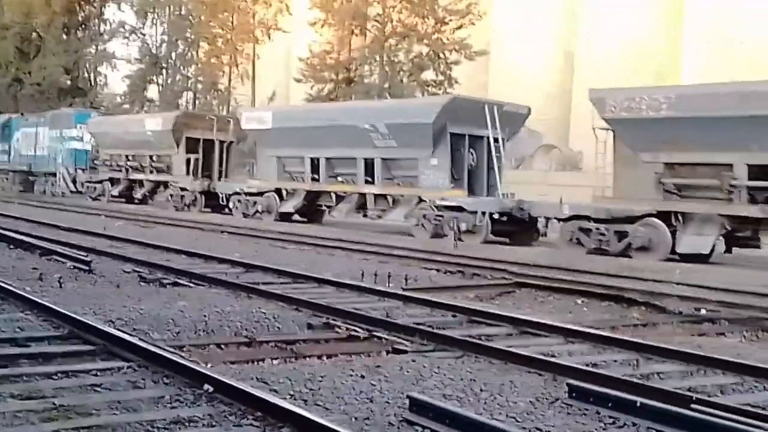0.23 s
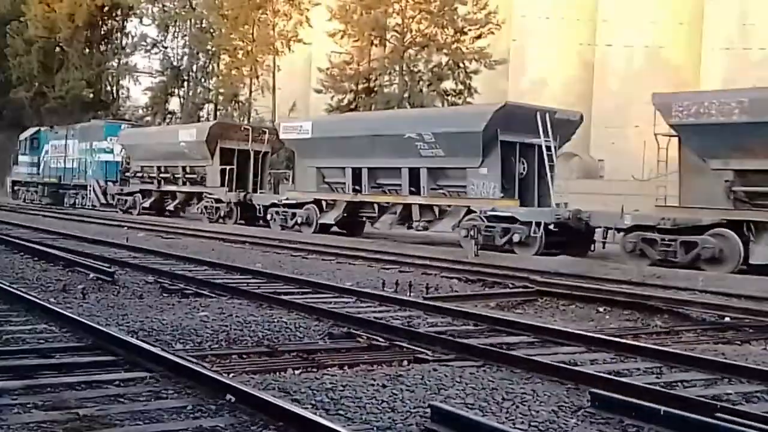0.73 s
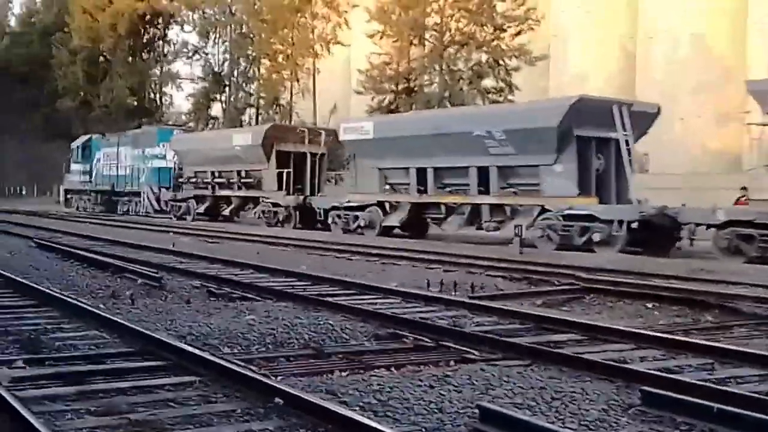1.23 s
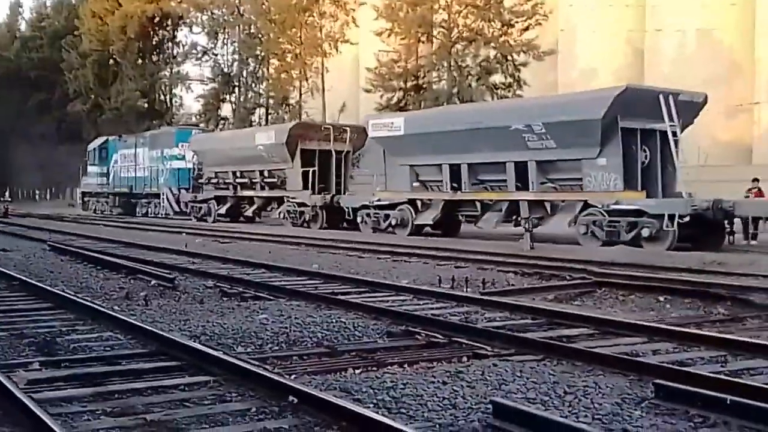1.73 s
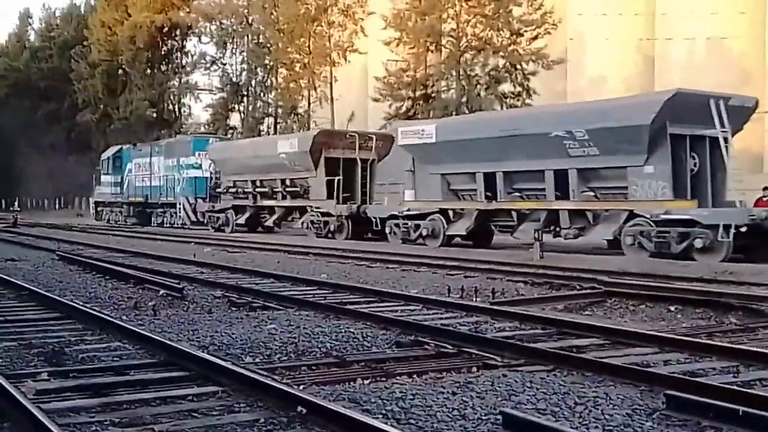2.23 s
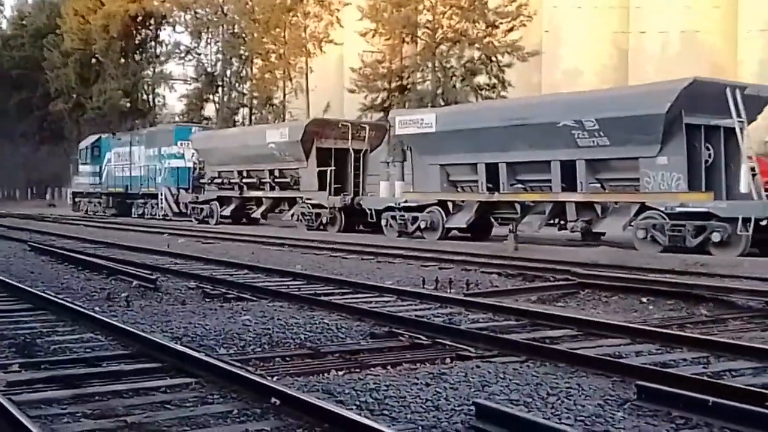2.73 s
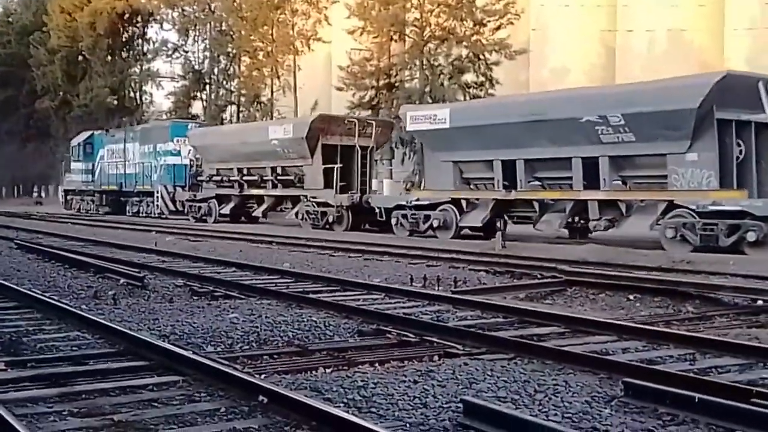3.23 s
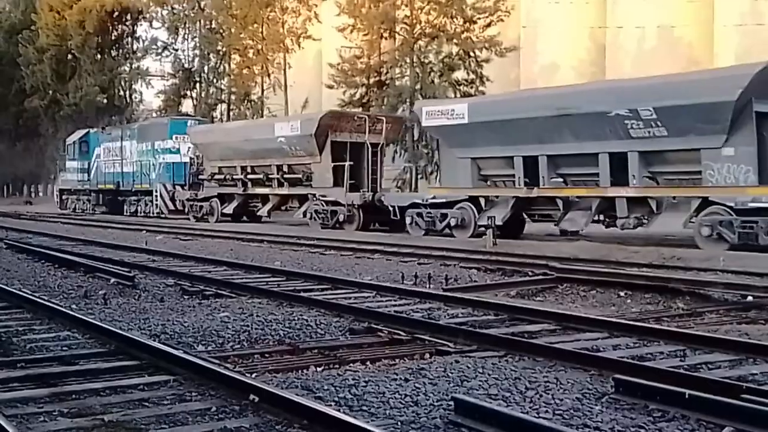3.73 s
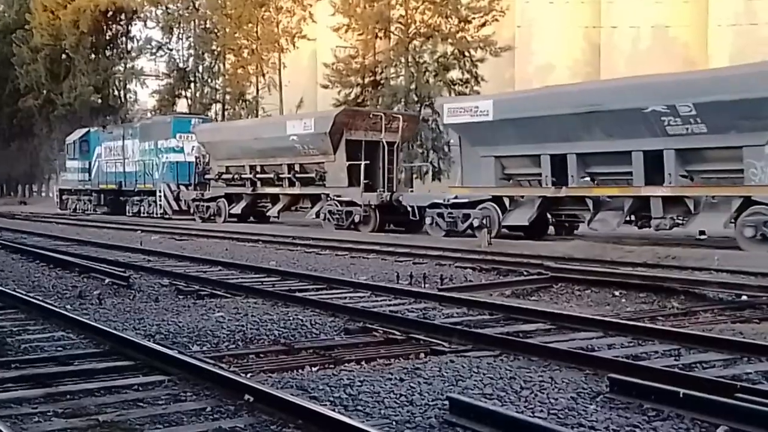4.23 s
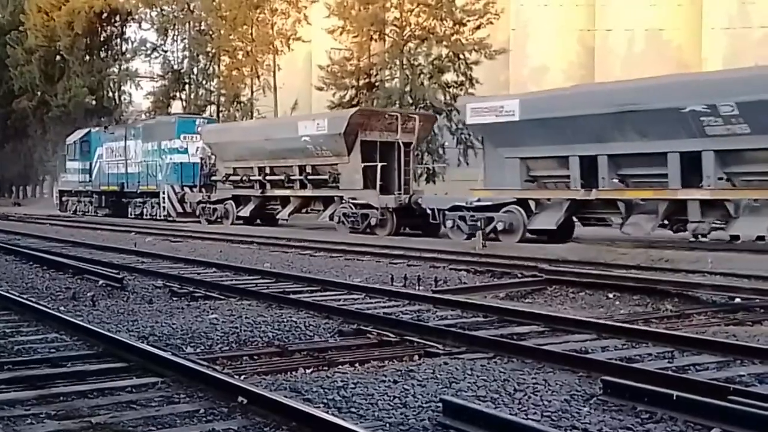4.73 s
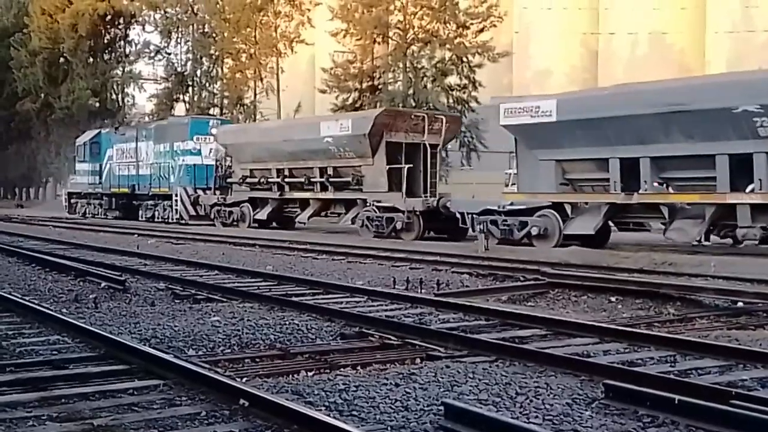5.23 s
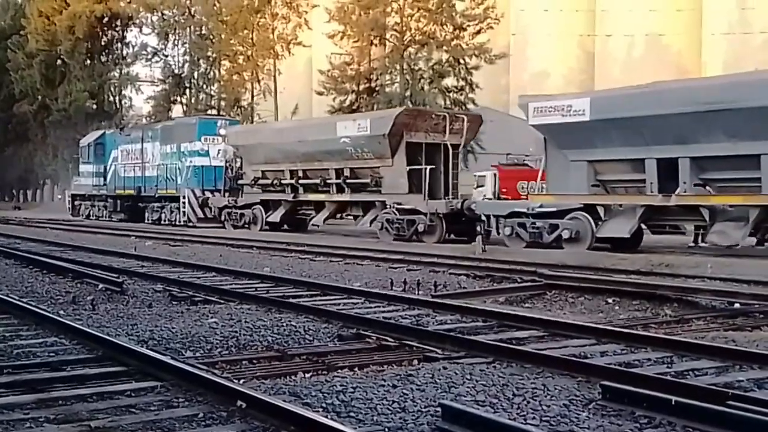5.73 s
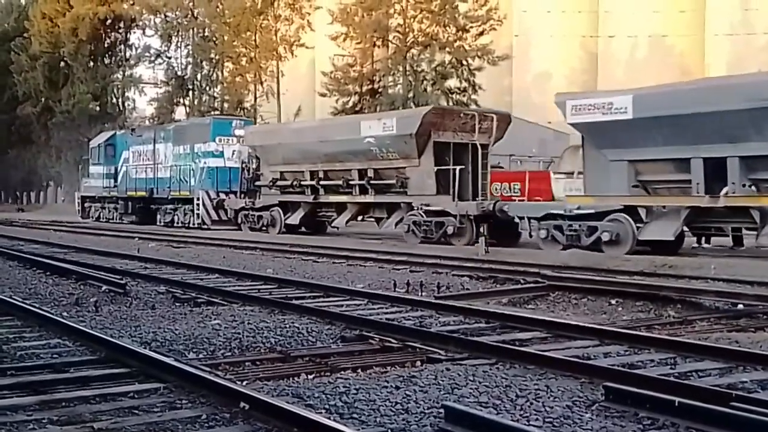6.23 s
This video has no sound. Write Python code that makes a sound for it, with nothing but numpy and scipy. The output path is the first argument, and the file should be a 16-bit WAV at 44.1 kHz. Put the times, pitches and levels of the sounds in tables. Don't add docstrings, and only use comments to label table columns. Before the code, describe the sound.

Low, gusting diesel rumble lies under a steady grainy hiss of steel wheels. Wagon bodies thud dully over joints, couplings tick, and flanges brush with thin metallic ringing. Birds in nearby trees give short descending whistles, echoed by hard walls. A brief chirp of steel comes at three seconds, a strong multi-toned squeal near four, another after six; all heard from some distance in the open.

```python
import sys
import numpy as np
from scipy import signal
from scipy.fft import rfft, irfft, next_fast_len
from scipy.io import wavfile

SR = 44100
rng = np.random.default_rng(int(sys.argv[2]) if len(sys.argv) > 2 else 0)


def level_to_linear(level):
    exponent = np.asarray(level, float) / 20
    return 10 ** exponent


def to_wav(s):
    ch = np.atleast_2d(s).T
    pcm = np.round(np.clip(ch, -1, 1) * 32767)
    wavfile.write(sys.argv[1], SR, pcm.astype(np.int16))


N = 286194
SPAN = next_fast_len(N)
BINS = np.fft.rfftfreq(SPAN, 1 / SR) + 1e-3
RUB_DB = -67.5


def rms_one(x):
    return x / np.sqrt(np.mean(x ** 2) + 1e-20)


def in_time(rows):
    s, *columns = np.transpose(rows)
    return [np.interp(np.arange(N) / SR, s, c) for c in columns]


def drift(rate_hz, size=N):
    pole = np.exp(-80 * np.pi * rate_hz / SR)
    coarse = rng.standard_normal(size // 40 + 602)
    slow = signal.lfilter([1], [1, -2 * pole, pole * pole], coarse)[500:]
    return np.interp(np.arange(size) / 40, np.arange(len(slow)), rms_one(slow))


def coloured(spectrum, patchy_db, rate_hz):
    hz, level_db = np.transpose(spectrum)
    log_bins = np.log(BINS)
    shape = level_to_linear(np.interp(log_bins, np.log(hz), level_db, left=-200, right=-200))
    upper = np.interp(log_bins, np.log(hz[[0, -1]]), [0, 1])
    noise = rfft(rng.standard_normal(SPAN)) * shape
    total = np.zeros(N)
    for share in (upper, 1 - upper):
        total += irfft(noise * share, SPAN)[:N] * level_to_linear(patchy_db * drift(rate_hz))
    return rms_one(total)


def thin_modes(noise, low_hz, high_hz, count, width_hz=12.5, come_and_go_db=4.0):
    spectrum = rfft(noise, SPAN)
    place = (np.arange(6)[:, None] + rng.random((6, count))) / 6
    modes_hz = low_hz + (high_hz - low_hz) * (np.arange(count) + place) / count
    lines = np.zeros(N)
    for group in modes_hz:
        comb = np.zeros(len(BINS))
        for hz in group:
            near = slice(*np.searchsorted(BINS, [hz - 150, hz + 150]))
            comb[near] += 1 / (1 + ((BINS[near] - hz) / width_hz) ** 2)
        lines += irfft(spectrum * comb, SPAN)[:N] * level_to_linear(come_and_go_db * drift(7.1))
    return rms_one(lines)


def add(out, s, sound):
    i = max(round(s * SR), 0)
    out[i:i + len(sound)] += sound[:N - i]


def tone(hz):
    return np.sqrt(2) * np.sin(2 * np.pi * np.cumsum(hz) / SR)


def rumble():
    # t/s, level/dB
    load = [(0.0, -34.5), (0.6, -35.5), (0.72, -43.5), (1.02, -44.5), (1.2, -33.5), (1.68, -31),
            (1.76, -41), (2.6, -37), (2.88, -46.5), (2.98, -31), (3.38, -31), (3.46, -40.5), (3.8, -43.5),
            (3.92, -31), (5.25, -32.5), (5.5, -37.5), (6.04, -37), (6.2, -32)]
    # f/Hz, level/dB per Hz
    deep_spectrum = [(12, -57), (20, -16), (70, -3), (110, 2), (140, -36), (240, -120)]
    # f/Hz, level/dB per Hz
    upper_spectrum = [(53, -8.5), (90, -0.5), (135, 0.5), (163, 3.5), (195, -1), (230, -13), (300, -28),
                      (390, -29), (660, -120)]
    deep_offset_db, deep_follows = -5.0, 0.58
    level_db, = in_time(load)
    deep_db = deep_offset_db + (deep_follows - 1) * (level_db - level_db.mean())
    deep = level_to_linear(deep_db) * coloured(deep_spectrum, patchy_db=1.2, rate_hz=7.0)
    upper = coloured(upper_spectrum, patchy_db=2.2, rate_hz=7.0)
    return level_to_linear(level_db) * (deep + upper)


def rolling():
    # t/s, level/dB
    weight = [(0.0, -49.5), (0.23, -48), (0.54, -51), (2.86, -51), (3.13, -48.5), (3.42, -50),
              (3.74, -49.5), (4.05, -47.5), (4.37, -50), (6.02, -50), (6.34, -49.5), (6.49, -48.5)]
    # f/Hz, level/dB per Hz
    body_spectrum = [(140, -21), (230, -2.5), (309, -5.5), (399, -4), (578, -12.5), (782, -9.5),
                     (863, -8.5), (959, -13.5), (1170, -12.5), (1400, -25), (1820, -39), (3080, -120)]
    # f/Hz, level/dB per Hz
    tread_spectrum = [(590, -21), (1000, -4.5), (1410, -1), (1850, -3.5), (2330, 1), (2700, -5),
                      (3330, -5.5), (3890, -5), (4410, -9), (5720, -17.5), (7140, -15), (7710, -13),
                      (10000, -22), (13000, -28.5), (22000, -120)]
    body_offset_db, body_follows, tread_db = 0.75, 0.49, 1.25
    roll_db, = in_time(weight)
    mean_db = roll_db.mean()
    body_db = body_offset_db + mean_db + body_follows * (roll_db - mean_db)
    body = level_to_linear(body_db) * coloured(body_spectrum, patchy_db=1.0, rate_hz=2.4)
    hiss = coloured(tread_spectrum, patchy_db=0.8, rate_hz=5.1)
    ringing = thin_modes(hiss, 2600, 9500, count=12, come_and_go_db=5.5)
    steel = rms_one(hiss + 0.22 * ringing)
    return body + level_to_linear(tread_db + roll_db) * steel


def brushing():
    # t/s, length/s, level/dB
    brushes = [(0.0, 0.14, -58), (0.43, 0.13, -55), (0.92, 0.33, -59.5), (1.38, 0.093, -57),
               (1.688, 0.15, -53.5), (2.015, .08, -54), (2.16, 0.17, -58), (2.45, 0.17, -56.5),
               (2.89, 0.11, -56), (3.215, 0.12, -62), (3.844, .3, -66), (4.272, 0.19, -62),
               (4.677, 0.14, -57), (5.32, .1, -59), (5.56, .1, -55), (5.706, 0.71, -58),
               (6.09, 0.41, -52.5), (6.423, 0.17, -50)]
    rise_s = 0.034
    t = np.arange(N) / SR
    power = level_to_linear(RUB_DB) ** 2
    for s, length_s, level_db in brushes:
        since = np.maximum(t - s, 0)
        touch = np.minimum(since / rise_s, 1) * np.exp(-(since / length_s) ** 2)
        power = power + (level_to_linear(level_db) * touch) ** 2
    return np.sqrt(power)


def rubbing():
    # f/Hz, level/dB per Hz
    flange_spectrum = [(2650, -22), (4500, -15), (5490, -12.5), (7080, -10), (7700, -6.5), (10600, -15.5),
                       (13500, -10.5), (15100, -11.5), (15600, -16)]
    fizz_hz, fizz_db, fizz_follows = 11000, 2, 0.55
    hiss = coloured(flange_spectrum, patchy_db=1.4, rate_hz=6.8)
    ringing = thin_modes(hiss, 4600, 15400, count=14, width_hz=9.0, come_and_go_db=7.0)
    rub = rms_one(hiss + 1.45 * ringing)
    touch = brushing()
    below = signal.sosfiltfilt(signal.butter(4, fizz_hz, fs=SR, output="sos"), rub)
    fizz_gain = level_to_linear(RUB_DB + fizz_db) * (touch / level_to_linear(RUB_DB)) ** fizz_follows
    return touch * below + fizz_gain * (rub - below)


def squeals():
    # f/Hz, peak level/dB, joins after/s, sings for/s
    heavy_wheel = [(1683, -47, 0, .05), (1886, -47, .01, .12), (2810, -43.5, .08, .2),
                   (2988, -44.5, .06, .19), (3122, -47, .24, .08), (3774, -41.5, .055, .1),
                   (3865, -46, .14, .09), (3690, -49, .3, .24), (4356, -51, 0, .05), (4619, -52, .3, .06),
                   (4788, -48.5, .06, .16), (5146, -45, .01, .13), (5825, -52, .09, .14), (6074, -47, .1, .2),
                   (6900, -50, .16, .12), (7429, -57, .03, .48), (6083, -49, .325, .12),
                 (8421, -46.5, .14, .24), (8872, -54, 0, .18), (9220, -49, .01, .26), (9465, -53, .02, .41),
                 (10779, -60, 0, .19), (12511, -58, .08, .14), (12790, -50, .04, .24),
                 (13464, -52.5, .03, .24), (13900, -54, .04, .14), (14300, -59, 0, .26),
                 (15140, -60, .06, .29),
                   (1890, -44.5, .15, 0.1), (1850, -56, .3, 0.17), (2130, -50, .17, .05),
                   (2810, -57, 0.3, 0.096), (3150, -50, 0.34, 0.063), (3360, -54, 0.28, .06),
                   (3780, -39, .13, 0.2), (3820, -42, 0.26, 0.033), (3770, -48, .31, 0.15),
                   (3865, -48, .25, 0.18), (4360, -47.5, .11, .09), (4356, -45, .22, 0.15),
                   (4330, -55, 0.435, .07), (4785, -42.5, 0.23, 0.14), (4788, -52, 0.32, .05),
                   (5100, -47, 0.18, 0.034), (7500, -51, 0.1, .07), (2988, -47, 0.002, 0.057),
                   (2810, -49, 0.00197, 0.091), (4100, -52, .15, .12), (3776, -47.5, 0.1, 0.424),
                   (4788, -60, 0.026, 0.54), (4356, -48, 0.34, .07), (2988, -57, 0.24, .08),
                   (7429, -64, 0.37, 0.15)]
    late_wheel = [(1800, -50, .01, .03), (1707, -51, .02, .1), (2713, -49, .02, .14),
                  (3122, -49, .008, .06), (3180, -51, .28, .08), (3394, -50, .2, .1),
                  (3663, -45.5, .075, .15), (4000, -52, .13, .15), (4616, -50, .11, .09),
                  (5500, -49.5, .02, .11), (7343, -49.5, .005, .11), (8398, -57, .14, .12),
                  (5703, -51, .12, .07), (4334, -52, .05, .025),
                  (1830, -43, .07, 0.04), (1800, -57, 0.11, .08), (3080, -48, 0.088, .04),
                  (4336, -52, 0.17, .06), (2240, -57, 0.12, .1), (3890, -51, 0.22, .06),
                  (2280, -55, .015, .03), (1800, -55, 0.0047, .23), (5550, -50, 0.14, 0.1),
                  (4334, -49, .09, 0.023), (3661, -56, 0.0088, 0.15), (3122, -57, 0.0073, .16),
                  (5590, -45, 0.095, 0.032)]
    light_wheel = [(2720, -47, .05, 0.035), (3360, -42.5, 0.00069, 0.054), (3750, -46.5, .02, .04),
                   (4150, -50, 0.011, .05), (6400, -64, 0, .1), (2730, -47, 0.13, .03),
                   (3350, -47, 0.065, 0.022), (3350, -42, 0.12, .012), (3784, -46, 0.032, 0.022),
                   (3784, -49, .105, 0.03), (4250, -50, .085, .04), (4183, -45, .145, .02),
                   (4200, -49, 0.185, 0.035), (3350, -58, 0, 0.18), (3784, -57, 0.02, 0.17),
                   (4200, -58, .03, 0.23), (2770, -52.5, .02, 0.19)]
    coupling = [(1190, -43, .016, 0.008), (1800, -52, .025, .02), (2590, -45, 0.021, .012),
                (2870, -44, .023, 0.025), (4530, -50, 0.0032, .035), (5800, -53, 0.016, 0.044),
                (7600, -54, 0.014, .04)]
    # t/s, sings for/s, f/Hz, peak level/dB
    peeps = [(0.14, 0.21, 6886, -64), (0.25, 0.072, 2285, -50), (0.43, 0.16, 8600, -68),
             (0.46, 0.04, 6700, -53), (0.877, 0.024, 4150, -44), (1.08, .08, 6368, -61),
             (1.36, 0.24, 3495, -52.5), (1.405, 0.033, 3470, -44), (1.465, .085, 3530, -49.5),
             (4.72, .03, 6560, -57), (4.71, .05, 3750, -54), (1.36, .09, 9045, -64),
             (1.363, 0.14, 8100, -57), (1.7, .16, 8040, -63), (1.72, .2, 9000, -68), (1.92, .05, 5198, -57),
             (2.016, 0.091, 9844, -61), (2.16, 0.079, 5220, -58), (2.482, 0.054, 7730, -50),
             (2.618, 0.095, 2320, -50), (6.35, .06, 5740, -58), (6.42, .06, 5900, -60),
             (0.335, 0.03, 3020, -49), (3.21, 0.063, 1523, -50), (4.265, 0.064, 4785, -52),
             (4.29, 0.16, 8800, -55.5), (4.3, 0.42, 5545, -58.5), (4.32, .11, 5048, -61),
             (4.38, 0.08, 4618, -53), (4.716, .035, 4640, -49), (4.713, .06, 8604, -58),
             (5.0, 0.055, 5450, -59), (5.03, 0.045, 3340, -56), (5.33, .16, 5580, -60),
             (5.412, 0.07, 4280, -52.5), (5.908, 0.14, 5040, -58.5)]
    contacts = [
        (3.84, 2.5, heavy_wheel),
        (6.11, 0.1, late_wheel),
        (2.904, -0.5, light_wheel),
        (0.775, 0, coupling)]
    edge_db, tail_db, neighbour_db = -6.0, -4.5, -11.0
    peak_share, slip_share, slips_per_s = 0.37, 0.27, 30

    songs = []
    for bind_s, grip_db, modes in contacts:
        for hz, level_db, wait_s, length_s in modes:
            songs.append((bind_s + wait_s, length_s, hz, level_db + grip_db))
    songs += peeps

    out = np.zeros(N)
    contact = np.array([drift(slips_per_s) for k in range(8)])
    chances = rng.random((len(songs), 4))
    for (start_s, length_s, hz, level_db), chance in zip(songs, chances):
        t = np.arange(round((length_s + 0.072) * SR)) / SR
        knots_s = [0, 0.004, peak_share * length_s, length_s, t[-1]]
        swell_db = np.interp(t, knots_s, [-40, edge_db, 0, tail_db - hz / 1700, -35])
        i = int(chance[3] * (N - SR))
        slips = contact[:, i:i + len(t)]
        drive = 1 + slip_share * (slips[0] + 1j * slips[1])
        cluster = drive * np.exp(2j * np.pi * hz * (t + round(start_s * SR) / SR))
        offsets = (0.008 + 0.024 * chance[:3]) * [1, -1, 1]
        for k, offset in enumerate(offsets, 1):
            drive = level_to_linear(neighbour_db) * 0.68 * (slips[2 * k] + 1j * slips[2 * k + 1])
            near_hz = hz + offset * min(hz, 6000)
            cluster = cluster + drive * np.exp(2j * np.pi * near_hz * t)
        add(out, start_s, level_to_linear(level_db + swell_db) * cluster.real)
    return out


def ticks_scrapes_booms():
    # t/s, length/s, low f/Hz, high f/Hz, level/dB rms
    tick_events = [(0.779, 0.076, 4400, 6800, -53.5), (0.782, 0.069, 1100, 4350, -48),
                   (0.92, 0.015, 4400, 13000, -49.5), (1.06, 0.09, 2500, 6800, -51),
                   (2.624, 0.013, 5500, 9600, -50.5), (3.1, 0.11, 336, 493, -46),
                   (3.827, 0.12, 1450, 1800, -50), (3.928, 0.23, 1460, 1580, -49),
                   (4.708, 0.066, 1700, 7000, -51.5), (4.724, 0.4, 336, 401, -51.5),
                   (5.554, 0.01, 7000, 14000, -54), (5.584, 0.0099, 7350, 14500, -50),
                   (6.11, 0.22, 1670, 1880, -48.5)]
    # t/s, length/s, low f/Hz, high f/Hz, level/dB rms
    scrapes = [
        (2.887, 0.24, 2000, 4440, -52.5),
        (3.847, 0.59, 2500, 8900, -50.5),
        (3.855, 0.2, 12600, 15300, -59),
        (3.91, 0.22, 12600, 15300, -56.5),
        (6.123, 0.6, 2300, 6200, -56),
        (6.17, 0.31, 3500, 4530, -57),
    ]
    # t/s, length/s, low f/Hz, high f/Hz, level/dB rms
    booms = [(0.191, 0.28, 55, 97.5, -34), (0.718, 0.091, 139, 209, -37), (1.389, 0.11, 146, 210, -33.5),
             (1.62, 0.099, 100, 213, -38), (1.803, 0.095, 50, 143, -35), (2.237, 0.13, 60, 141, -35),
             (2.412, 0.068, 91, 194, -39.5), (2.598, 0.064, 142, 214, -36.5),
             (2.968, 0.084, 142, 197, -30.5), (3.297, 0.077, 140, 197, -31.5), (3.483, 0.16, 50, 172, -36),
             (3.86, 0.15, 150, 221, -35), (4.485, 0.078, 60, 201, -32), (4.598, 0.076, 90, 160, -36),
             (5.008, 0.14, 122, 213, -33.5), (5.12, 0.196, 148, 227, -37), (5.62, 0.3, 50.5, 131, -35.5),
             (6.123, 0.077, 100, 220, -34.5), (6.314, 0.11, 60, 198, -35.5), (0.246, 0.49, 336, 400, -56),
             (2.2, 0.42, 345, 417, -54), (5.198, 0.52, 325, 402, -55.5)]
    out = np.zeros(N)
    white = rng.standard_normal(N)
    steel = 0.4 * white + thin_modes(white, 1400, 15200, count=24, width_hz=16.0, come_and_go_db=4.0)
    for s, length_s, low_hz, high_hz, level_db in tick_events + scrapes + booms:
        share = np.arange(round(1.2 * length_s * SR)) / (length_s * SR)
        band = signal.butter(3, [low_hz, high_hz], "band", fs=SR, output="sos")
        source = white if length_s < 0.03 or high_hz < 1000 else steel
        scuff = rms_one(signal.sosfilt(band, source[round(s * SR):][:len(share)]))
        envelope = np.minimum(share / 0.1, 1) * np.exp(-(1.1 * share) ** 3)
        add(out, s, level_to_linear(level_db) * scuff * envelope[:len(scuff)])
    return out


def yard_echo(sound):
    echo_db, t60_s = -9.5, 0.5
    t = np.arange(SR // 2) / SR
    echoes = rng.standard_normal(len(t)) * level_to_linear(-60 * t / t60_s) * (t > 0.012)
    echoes /= np.sqrt(np.sum(echoes ** 2))
    return level_to_linear(echo_db) * signal.fftconvolve(sound, echoes)[:N]


def birds():
    # t/s, length/s, first f/Hz, last
    # f/Hz, level/dB rms
    whistles = [(0.446, 0.041, 6900, 4250, -48.5), (0.453, 0.175, 3530, 2870, -50),
                (1.071, 0.22, 4207, 3490, -37.5), (1.259, 0.072, 3605, 3200, -42),
                (1.252, 0.14, 3790, 3460, -51), (1.134, 0.051, 3720, 3680, -48),
                (1.19, .09, 3970, 3780, -49), (1.343, 0.08, 3160, 3000, -56),
                (1.404, 0.08, 3050, 2900, -47.5), (1.46, .07, 2920, 2860, -50.5),
                (1.956, 0.08, 4220, 4240, -49), (1.987, 0.075, 4200, 3940, -49),
                (2.014, .15, 4270, 3800, -46), (2.07, 0.12, 3850, 3350, -49), (2.108, .08, 4050, 3850, -53),
                (3.183, 0.027, 4520, 4360, -45.5), (3.22, 0.063, 4150, 4440, -53),
                (3.262, 0.11, 3360, 3180, -55), (3.356, 0.082, 3430, 3200, -47),
                (3.42, 0.16, 3180, 2760, -57), (3.464, 0.05, 4540, 4620, -54),
                (3.644, 0.067, 4340, 4150, -52), (4.617, 0.066, 5050, 4250, -54),
                (4.644, 0.03, 4680, 4350, -53), (4.758, 0.057, 6960, 4040, -47),
                (4.943, .135, 3430, 3330, -53.5), (5.32, 0.16, 3590, 2960, -44),
                (5.47, 0.18, 2960, 2740, -59), (5.448, 0.049, 4270, 3420, -53),
                (5.958, 0.08, 3360, 3190, -53.5), (6.031, .08, 3160, 2960, -55),
                (5.969, 0.062, 4350, 3150, -51)]
    chip_s, chip_bend, glide_bend = 0.06, 0.8, 0.97
    out = np.zeros(N)
    for start_s, length_s, first_hz, last_hz, level_db in whistles:
        share = np.linspace(0, 1, round(length_s * SR))
        if length_s < chip_s:
            fallen = np.sin(np.pi / 2 * share ** chip_bend) ** 2
        else:
            fallen = share ** glide_bend
        glide_hz = first_hz + (last_hz - first_hz) * fallen
        if level_db > -42:
            shape = 0.15 + np.sin(0.9 * np.pi * share) ** 2
        else:
            shape = (0.5 + 3 * np.minimum(share, 0.25)) * np.exp(-1.4 * share)
        swell = shape * np.minimum(1, 10 * np.minimum(share, 1 - share))
        flutter = level_to_linear(2.6 * drift(55.0, size=SR // 2)[:len(share)])
        add(out, start_s, level_to_linear(level_db) * swell * flutter * tone(glide_hz))
    return out + yard_echo(out)


def scene():
    train = rumble() + rolling() + rubbing() + squeals() + ticks_scrapes_booms()
    return (train + birds())[None]


def roll_off(x):
    return signal.sosfilt(signal.butter(12, 15780, fs=SR, output="sos"), x)


def record(dry):
    dull = signal.sosfilt(signal.butter(8, 15500, fs=SR, output="sos"), dry)
    return roll_off(dull)


dry = scene()
out = record(dry)
to_wav(out)
```